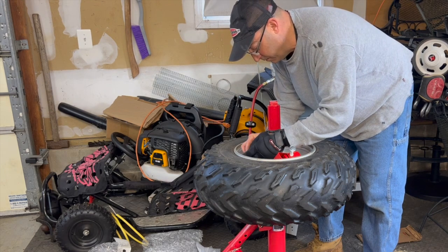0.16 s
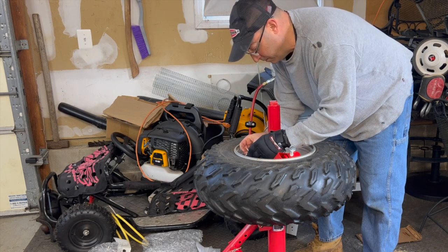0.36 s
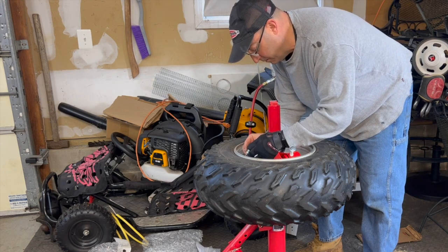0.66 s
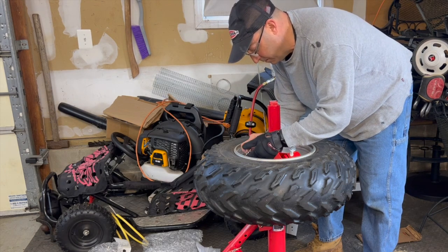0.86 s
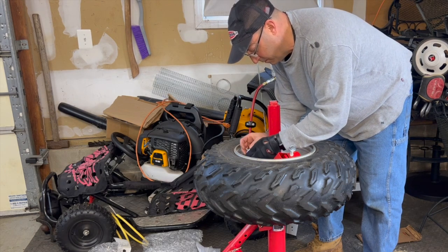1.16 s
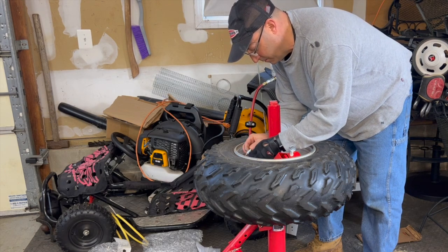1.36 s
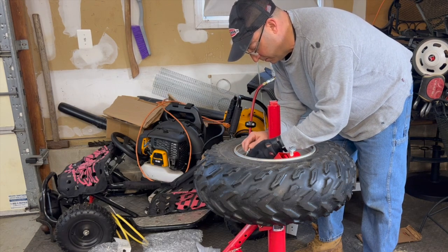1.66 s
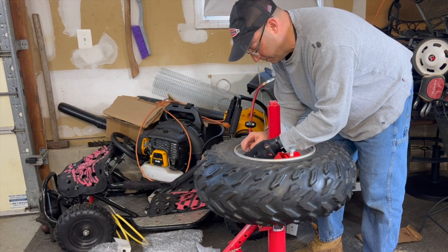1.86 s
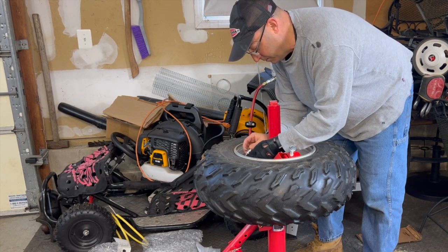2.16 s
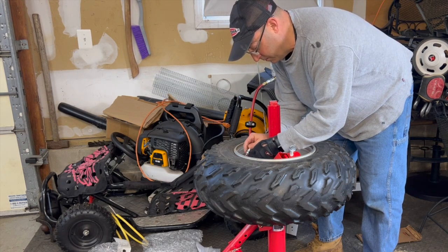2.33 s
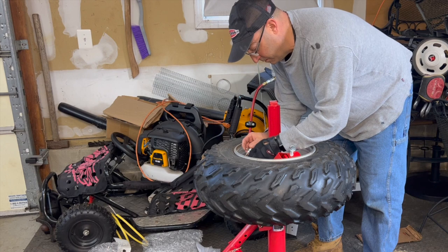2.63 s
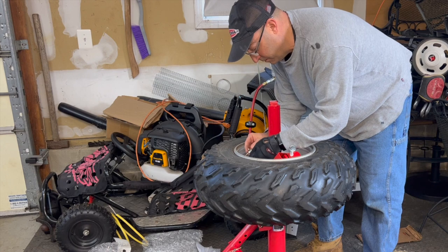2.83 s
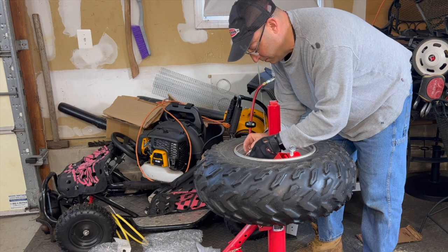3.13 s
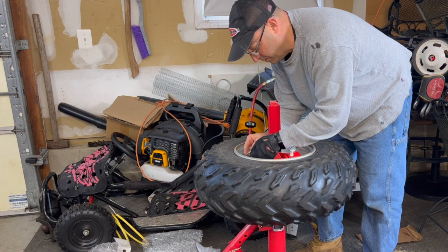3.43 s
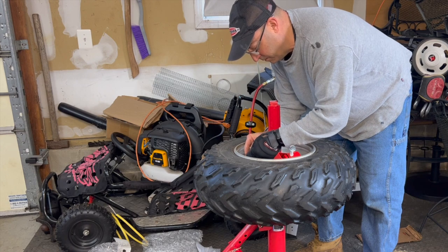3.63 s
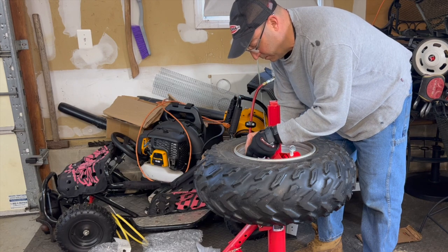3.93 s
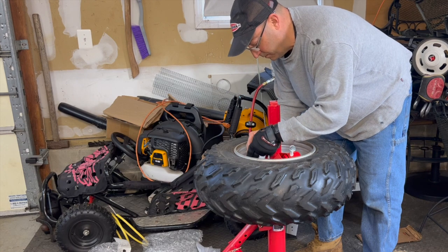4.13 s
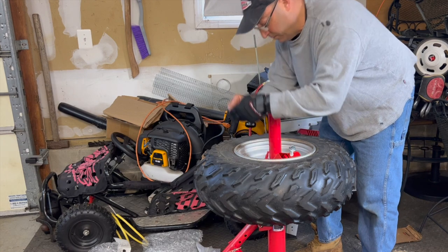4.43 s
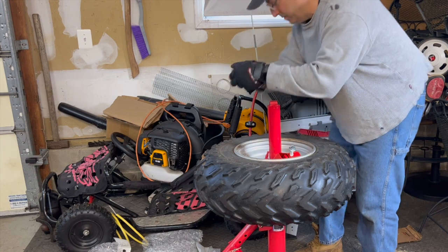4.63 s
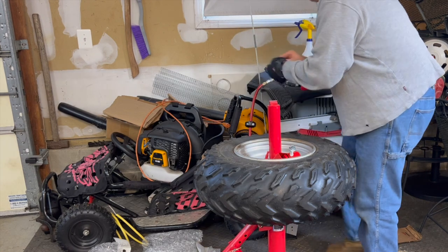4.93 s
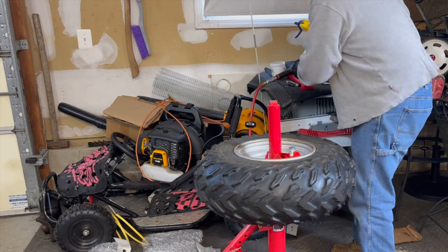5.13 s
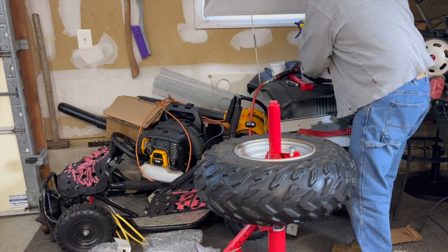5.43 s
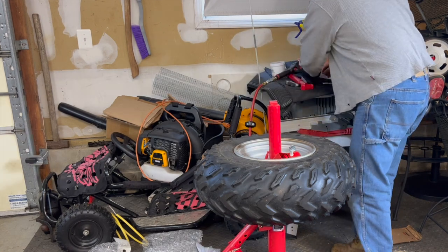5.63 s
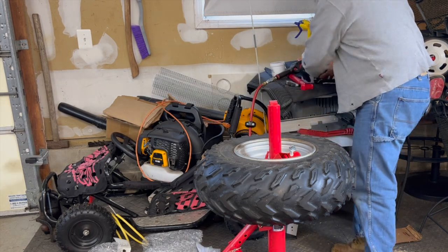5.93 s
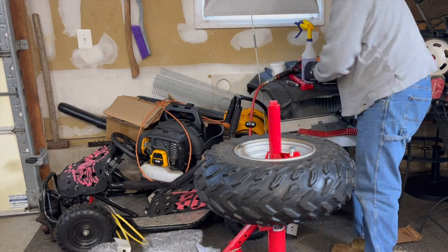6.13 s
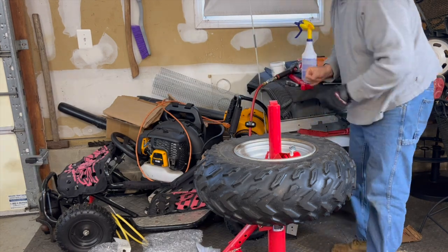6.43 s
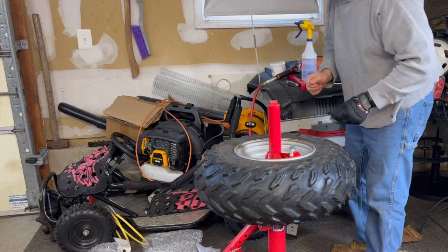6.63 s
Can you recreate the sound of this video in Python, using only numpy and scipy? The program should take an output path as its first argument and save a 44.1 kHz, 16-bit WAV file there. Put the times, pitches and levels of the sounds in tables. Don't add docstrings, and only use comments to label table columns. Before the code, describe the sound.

A tool taps lightly at a wheel rim over a thin leak, sputtering air starts, then pressurized air hisses freely until the end.

```python
import sys
import numpy as np
from scipy import signal
from scipy.fft import rfft, irfft
from scipy.io import wavfile
from scipy.ndimage import uniform_filter1d

SR = 44100
rng = np.random.default_rng(int(sys.argv[2]) if len(sys.argv) > 2 else 0)


def volts_from_decibels(level):
    exponent = np.asarray(level, float) / 20
    return 10 ** exponent


def generate_wav(signal):
    frames = np.transpose(np.atleast_2d(signal))
    scaled = np.clip(frames, -1, 1) * 32767
    pcm = np.round(scaled).astype(np.int16)
    wavfile.write(sys.argv[1], SR, pcm)


N = 298998
HZ = np.fft.rfftfreq(N, 1 / SR)
TIME_S = np.arange(N) / SR
CORE_OUT_S, CORE_SLIP_S = 4.05, 0.028


def jet():
    # hz, level_db
    jet_colour = [(150, -39), (350, -22.5), (600, -23), (1000, -18), (1500, -15), (2100, -9.5),
                  (3200, -7.5), (4200, -10), (5500, -3.5), (6800, -0.5), (8600, 2.5), (11100, 4),
                  (12600, -9.5), (15000, -0.5)]
    # hz, width_hz, level_db
    rim = [(460, 37, -47), (848, 52, -10), (1415, 90, -6), (1870, 76, -36), (6740, 78, 2), (7610, 23, 3),
           (7600, 60, -12), (9700, 750, -3.5)]
    flow_db, cover, hand = controls()
    base = volts_from_decibels(along(jet_colour))
    rings = sum(volts_from_decibels(db) / (1 + (2 * (HZ - hz) / width_hz) ** 2) for hz, width_hz, db in rim) / base
    treble_dip = 1 - 0.35 / (1 + ((HZ - 10100) / 450) ** 2)
    colour = base * (1 + 0.25 * rings) * treble_dip
    low, whistle, middle = band(260, 1500), band(1500, 5100), band(5100, 9000)
    upper, top = band(7000, 40000), band(9000, 40000)

    out = noise(colour * middle * np.sqrt(1 - upper ** 2)) * volts_from_decibels(1.2 * cover + 0.62 * walk(9.8))
    seated = 1 - after(CORE_OUT_S, CORE_SLIP_S)
    out += noise(colour * middle * upper) * volts_from_decibels(-4 * cover * seated + 0.64 * walk(11))
    out += noise(colour * whistle) * volts_from_decibels(3.0 + 1.9 * hand + 4.35 * cover + 0.8 * walk(15))
    out += noise(colour * low) * volts_from_decibels(0.3 + 14 * hand - 3 * cover - 9 * pop() + 2.0 * walk(11))
    out += noise(colour * top) * volts_from_decibels(-5.0 + 6.8 * hand - 15 * cover + 0.47 * walk(13))
    out /= np.sqrt(np.mean((colour * band(4880, 9740)) ** 2))
    return (out + valve(cover, hand)) * volts_from_decibels(flow_db)


def valve(cover, hand):
    out = after(CORE_OUT_S, CORE_SLIP_S)
    core = sung(4580, 2550, -30 + 16 * hand + 14 * cover - 11 * out, flutter_db=3.5, rate_hz=15.0)
    stem = sung(2730, 430, -24 + 7 * cover + 10.5 * out, flutter_db=2.4, rate_hz=8)
    surge = pop() * sung(2800, 1500, -3, flutter_db=1.5, rate_hz=30)
    room = sung(218, 260, -35 + 8 * hand - 22 * cover + lull_db(), flutter_db=1.5, rate_hz=4.6)
    return core + stem + surge + room


def sung(hz, width_hz, level_db, flutter_db, rate_hz):
    air = unit(noise(1 / (1 + (2 * (HZ - hz) / width_hz) ** 2)))
    return air * volts_from_decibels(level_db + flutter_db * walk(rate_hz))


def pop():
    fade_s = 0.08
    return after(CORE_OUT_S, CORE_SLIP_S) * np.exp(-np.maximum(TIME_S - CORE_OUT_S, 0) / fade_s)


def controls():
    # start_s, flow_db, cover (tool over the mouth, 0-1)
    flow = [(2.52, -74, 0.1), (2.58, -35.5, 0.44), (2.67, -34.5, 0.75), (2.71, -44, 0.65),
            (2.8, -42.5, 0.64), (2.85, -37, .4), (2.97, -31, 0.78), (3.07, -38.5, 1.0), (3.2, -38, 0.72),
            (3.35, -38.5, 0.03), (3.759, -35, 0.23), (3.86, -30.5, 0), (4.0, -30.5, 0.32),
            (4.08, -26.5, 0.78), (4.2, -29, 0.53), (4.29, -29, 0.54), (4.45, -26.5, 0.03),
            (6.78, -27.5, 0.09)]
    hand_off_s, hand_slip_s = 4.41, 0.046
    s, level_db, cover = np.transpose(flow)
    flow_db = np.interp(TIME_S, s, level_db, left=-120)
    return flow_db, np.interp(TIME_S, s, np.clip(cover, 0, 1)), 1 - after(hand_off_s, hand_slip_s)


def lull_db():
    return -22 * np.exp(-((TIME_S - 3.38) / 0.075) ** 2)


def fumble():
    # hz, level_db
    leak_colour = [(4000, -17.5), (5000, -9), (6000, 1.5), (6700, -3.5), (7600, -6.5), (9500, -7.5),
                   (11000, -14.5), (12700, -27), (15000, -17)]
    colour = volts_from_decibels(along(leak_colour))
    leak_db = swells(-74, column=2) + 3.0 + 1.0 * walk(8.1)
    top_db = swells(-92, column=4) + 8.0 + 1.0 * walk(12)
    cloth_db = swells(-85, column=3) - 1.5 + 2.9 * walk(25.03)
    low_db = swells(-81.5, column=3, lift_db=-10.5) - 4.0 + 1.4 * walk(12.0)
    out = unit(noise(colour * band(3000, 9800))) * volts_from_decibels(leak_db)
    out += unit(noise(colour * band(13000, 40000))) * volts_from_decibels(top_db)
    out += unit(noise(band(1660, 3600))) * volts_from_decibels(cloth_db)
    return out + unit(noise(band(340, 1070))) * volts_from_decibels(low_db)


def swells(rest_db, column, lift_db=0):
    # middle_s, length_s, leak_db, rustle_db, top_air_db
    moves = [(0.0, 0.22, -67.5, -93, -96), (.23, 0.065, -72, -95, -92), (.52, 0.36, -68, -78, -87),
             (0.86, 0.44, -72.5, -73.5, -100), (1.05, 0.13, -73, -67.5, -86), (1.244, .12, -79, -74, -90),
             (1.367, 0.26, -69, -81, -79), (1.537, 0.17, -67, -66, -98), (1.7, .12, -85, -71.5, -98),
             (1.843, 0.15, -75, -67.5, -77), (2.014, 0.23, -81, -71, -69), (2.203, 0.13, -72, -70, -84),
             (2.401, 0.16, -78, -66.5, -84), (2.51, 0.14, -75, -66, -71)]
    t = TIME_S[::64]
    power = volts_from_decibels(2 * rest_db)
    for move in moves:
        middle_s, length_s = move[:2]
        power = power + volts_from_decibels(2 * (move[column] + lift_db)) * np.exp(-(2 * (t - middle_s) / length_s) ** 2)
    return np.interp(TIME_S, t, 10 * np.log10(power))


def ticks():
    # start_s, peak_db, pitch_hz, crack_share, thud_db (tyre)
    touches = [
        (.822, -78, 460, 1.1, -9),
        (0.921, -52, 820, 0.33, -26),
        (1.253, -65, 700, 1.3, -22),
        (1.461, -46, 1800, 2.4, -28),
        (1.845, -55, 1500, 1.6, -15.5),
        (1.968, -41, 1600, 0.33, -18.5),
        (2.168, -53.5, 1600, 0.73, -8.5),
    ]
    # hz, level_db, t60_s
    wheel = [(427, -9, 0.067), (623, 0, 0.24), (824, 2.5, 0.26), (1130, -28, .1), (1240, -9, .1),
             (1460, 1.5, 0.24), (2170, 0.5, .14), (2950, -4, 0.049), (3380, -12, .06), (4250, -1, 0.041)]
    out, t = np.zeros(N), TIME_S[:SR // 2]
    thud_band = signal.butter(2, [150, 480], "band", fs=SR, output="sos")
    for s, peak_db, pitch_hz, share, thud_db in touches:
        chance = rng.standard_normal((len(wheel), 2))
        crack = rng.standard_normal(len(t)) * (2.7 * np.exp(-t / 0.0042) + 0.8 * np.exp(-t / 0.06))
        octaves = np.clip(0.8 + 0.3 * share, 0.3, 2.5)
        edges_hz = pitch_hz * 2 ** (octaves * np.array([-1.4, 1]))
        crack_band = signal.butter(3, edges_hz, "band", fs=SR, output="sos")
        ring = share * signal.sosfilt(crack_band, crack)
        grip = 1 + 3 * (pitch_hz / 1700) ** 2 * np.exp(-t / 0.006)
        for (hz, mode_db, t60_s), (phase, scatter) in zip(wheel, chance):
            near_db = mode_db + 0.74 * scatter - 9 * abs(np.log2(hz / pitch_hz))
            decay = np.exp(-np.log(1000) * t / t60_s)
            ring += 0.19 * grip * volts_from_decibels(near_db) * np.sin(2 * np.pi * hz * t + phase) * decay
        thud = unit(signal.sosfilt(thud_band, rng.standard_normal(len(t))))
        ring = ring / abs(ring).max() + volts_from_decibels(thud_db) * thud * np.exp(-t / 0.032)
        rise = 1 - np.exp(-t / 0.00079 * (pitch_hz / 1600) ** 2)
        start = int(s * SR)
        out[start:start + len(t)] += ring * rise * volts_from_decibels(peak_db + 4.0)
    return out


def rumble():
    # hz, level_db
    rumble_colour = [(15, -52), (25, -43), (41, -9.5), (70, -1), (136, -7.5), (227, -16), (257, -19),
                     (288, -17.5), (314, -19), (500, -26), (650, -53), (1100, -120)]
    building_db, shake_db = -69.5, -31.5
    flow_db, cover, hand = controls()
    size = np.hypot(volts_from_decibels(building_db), volts_from_decibels(flow_db + shake_db - 1.1 * hand - 5.2 * cover))
    return unit(noise(volts_from_decibels(along(rumble_colour)))) * size * volts_from_decibels(lull_db() + 0.91 * walk(5.47))


def garage():
    t = TIME_S[:SR]
    t60_s, treble_t60_s = 0.41, 0.75
    slow = rng.standard_normal(SR) * np.exp(-np.log(1000) * t / t60_s) * (1 - np.exp(-t / 0.0019))
    treble = signal.lfilter(*signal.butter(1, 3500, "high", fs=SR), slow)
    tail = slow - treble * (1 - np.exp(-np.log(1000) * t / treble_t60_s))
    return tail / np.sqrt(np.sum(tail ** 2))


def along(points, column=1):
    rows = np.array(points, float)
    return np.interp(np.log(HZ + 1), np.log(rows[:, 0]), rows[:, column])


def unit(x):
    return x / np.sqrt(np.mean(x ** 2))


def noise(gain):
    bins = rng.standard_normal(len(HZ)) + 1j * rng.standard_normal(len(HZ))
    return irfft(bins * gain * np.sqrt(N / 2), N)


def band(lo_hz, hi_hz):
    return np.sqrt(1 / (1 + (lo_hz / (HZ + 1)) ** 4) - 1 / (1 + (hi_hz / (HZ + 1)) ** 4))


def walk(rate_hz):
    k = int(SR / rate_hz)
    held = np.repeat(rng.standard_normal(N // k + 1), k)
    return uniform_filter1d(uniform_filter1d(held, k), k)[:N]


def after(s, slip_s):
    return 0.5 + 0.5 * np.tanh((TIME_S - s) / slip_s)


def scene():
    # hz, likeness (0-1), right_lead_half_turns, left_minus_right_db
    ports = [(60, .96, 0, 1), (300, .86, .06, .8), (600, .7, .15, 1), (1000, .5, .25, 1.4),
             (2000, .64, -.03, .3), (3000, .48, -.3, 1.2), (4100, .48, -.2, 3.5), (5500, .18, -.45, 5),
             (6700, .4, -.2, 7), (7400, .28, -.3, 3.5), (7900, .5, -.15, 1.5), (8400, .82, 0, .6),
             (8800, .62, .1, 0), (9200, .2, .2, 0)]
    # hz, half_turns
    half_turns = [(9300, .5), (9800, .84), (10400, 1.1), (11150, 1.5), (11650, 1.9), (12550, 2.1),
                  (12900, 2.5), (13400, 2.93), (14100, 3.2), (14700, 3.5), (15100, 3.9)]
    garage_db = -4
    taps = ticks()
    direct = jet() + fumble() + taps
    echo = volts_from_decibels(garage_db) * signal.fftconvolve(direct, garage())[:N]
    left = (direct + echo) / np.sqrt(1 + volts_from_decibels(2 * garage_db)) + rumble()
    other = signal.fftconvolve(jet() + fumble() + 1.12 * taps, garage())[:N] + 0.5 * taps + rumble()
    fade = np.minimum(1, (N - np.arange(N)) / 300)
    left, other = rfft(left * fade), rfft(other * fade)

    like = np.clip(along(ports), 0, 1) * np.exp(1j * np.pi * along(ports, column=2))
    like = np.where(HZ < half_turns[0][0], like, np.cos(np.pi * along(half_turns)))
    right = like * left + np.sqrt(1 - abs(like) ** 2) * other
    tilt = volts_from_decibels(along(ports, column=3) / 2)
    return np.array([irfft(left * tilt, N), irfft(right / tilt, N)])


def low_pass(x):
    return signal.sosfilt(signal.butter(12, 17100, fs=SR, output="sos"), x)


def record(dry):
    pair = np.array([dry[0] + dry[1], dry[0] - dry[1]]) / 2
    shape = dict(window="cosine", nperseg=2048, noverlap=1024)
    hz, _, parts = signal.stft(pair, SR, **shape)
    power = abs(parts[:, :1024]) ** 2
    power = power.reshape(2, 64, 16, -1).mean(axis=2)
    power = np.repeat(power * volts_from_decibels(5.2 * rng.standard_normal(power.shape)), 16, axis=1)
    weak = (power < volts_from_decibels(-19) * power[::-1]) & (hz[:1024, None] > 9400)
    parts[:, :1024][weak] = 0
    parts[:, hz > 15740] = 0
    mid, side = signal.istft(parts, SR, **shape)[1][:, :N]
    return low_pass(np.array([mid + side, mid - side]))


dry = scene()
out = record(dry)
generate_wav(out)
```